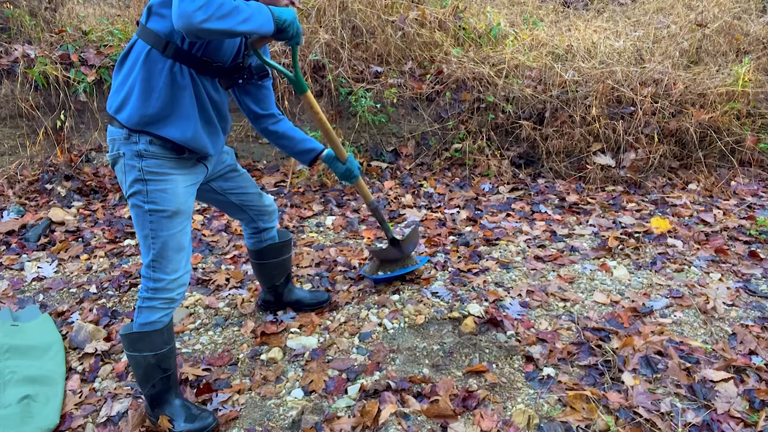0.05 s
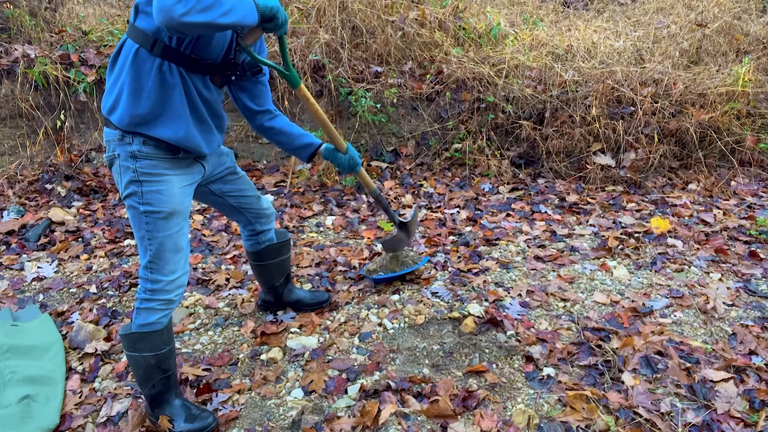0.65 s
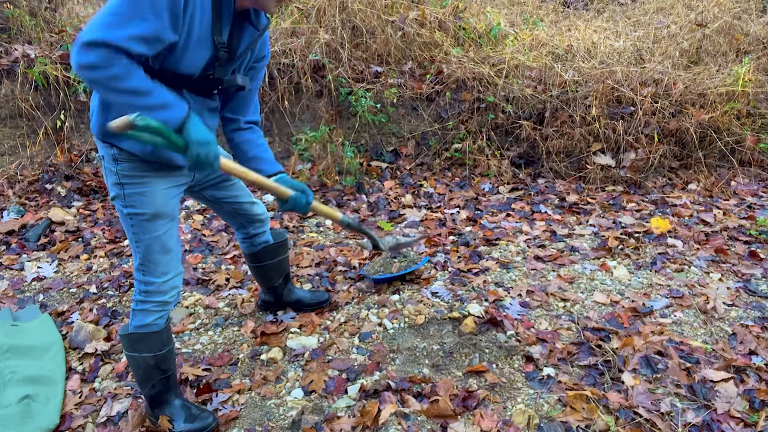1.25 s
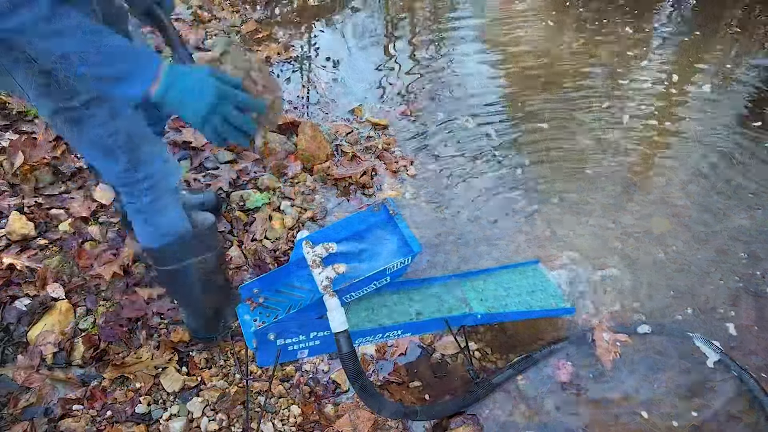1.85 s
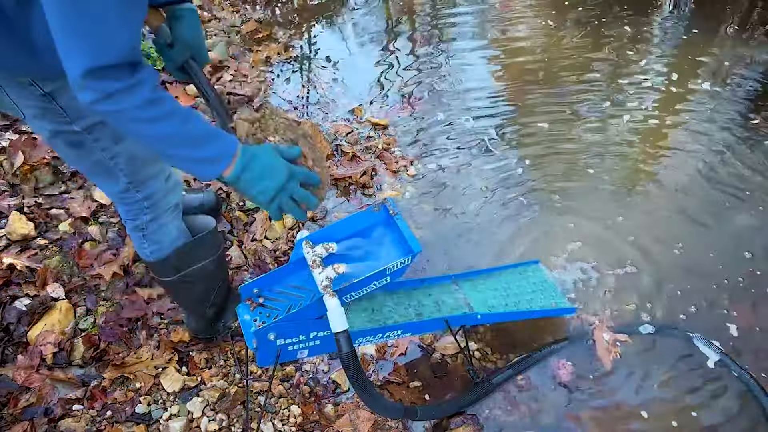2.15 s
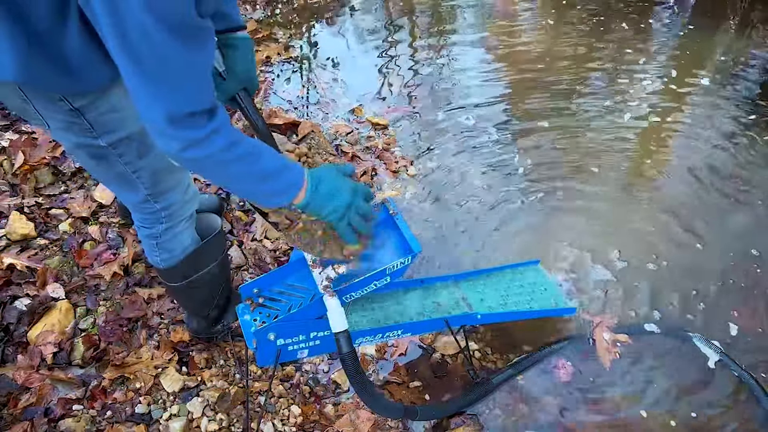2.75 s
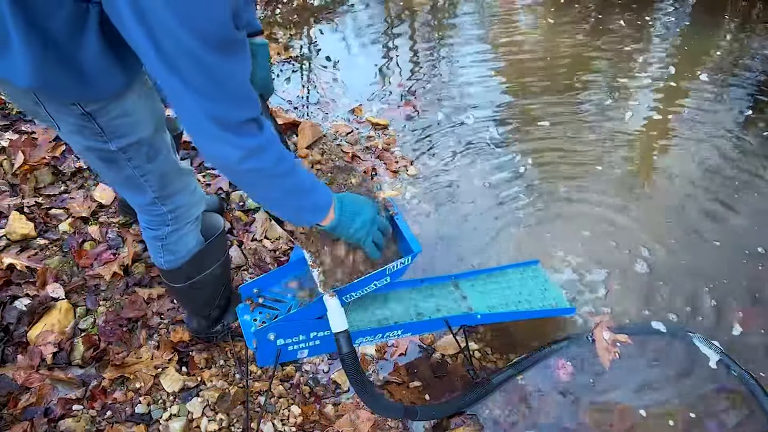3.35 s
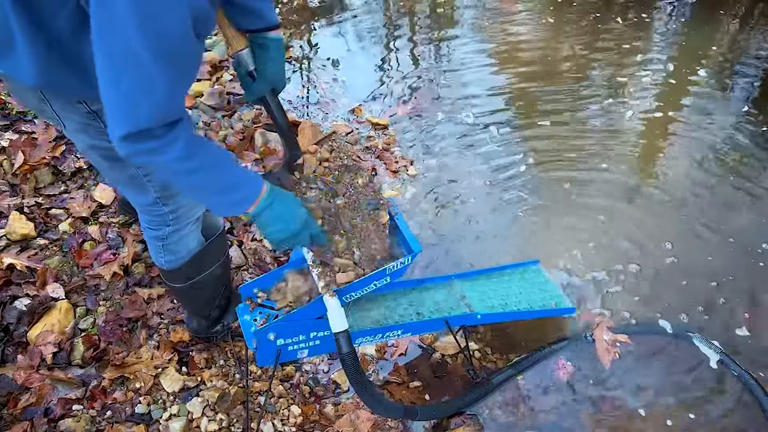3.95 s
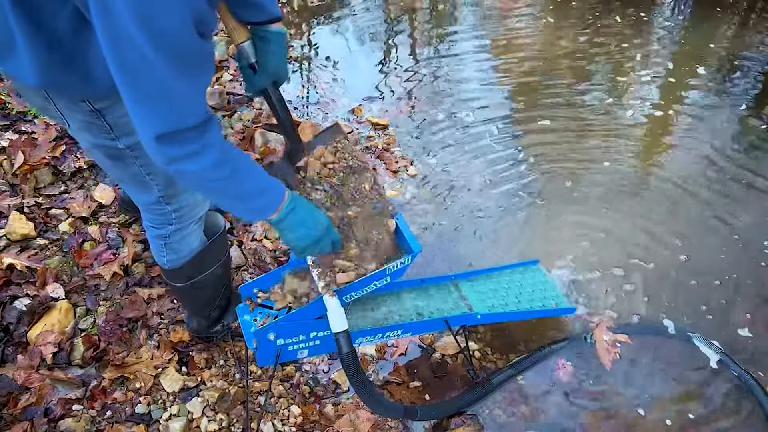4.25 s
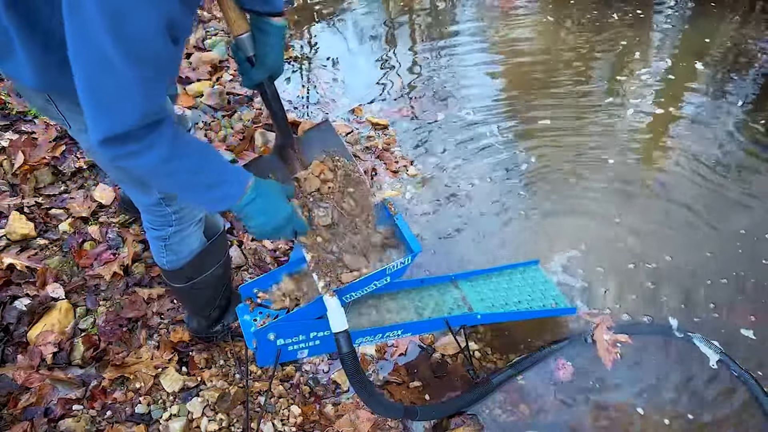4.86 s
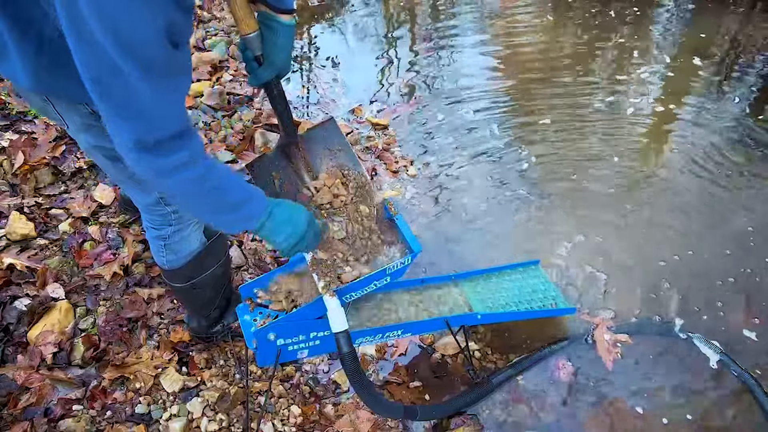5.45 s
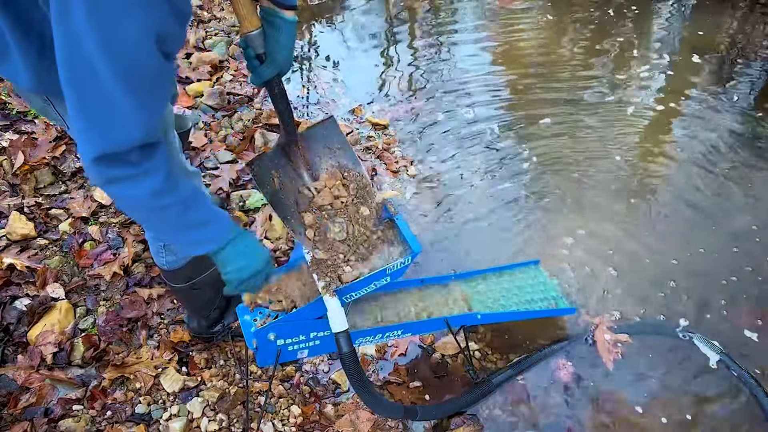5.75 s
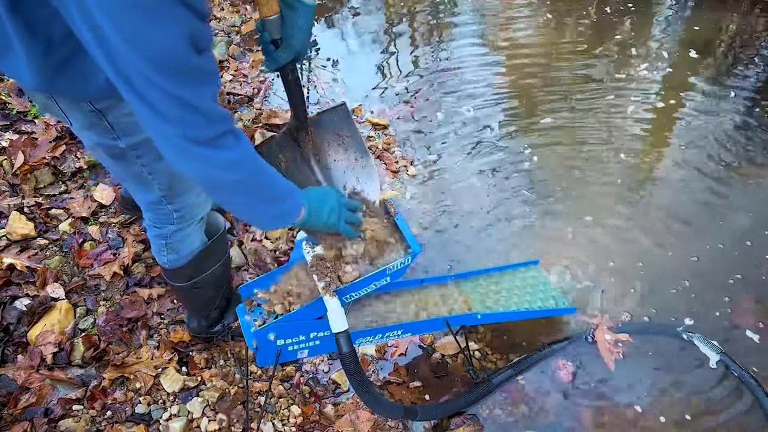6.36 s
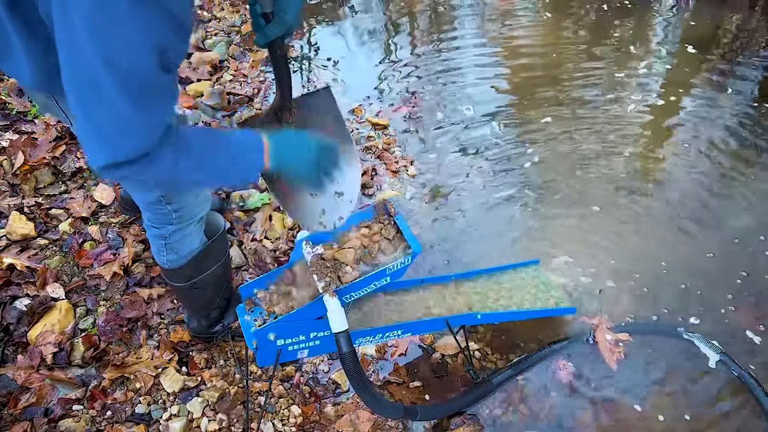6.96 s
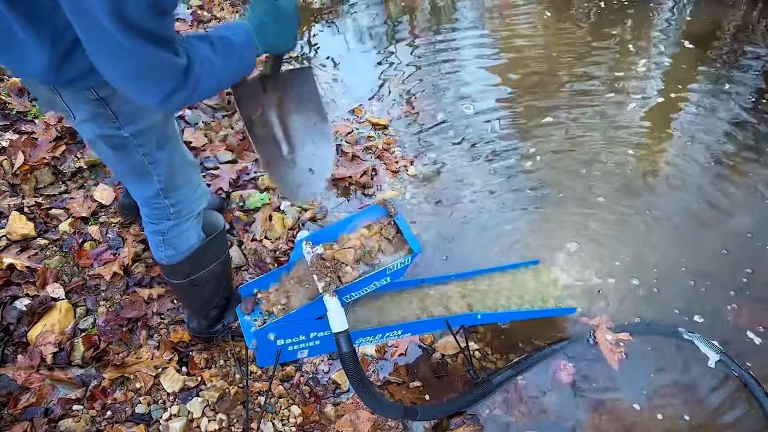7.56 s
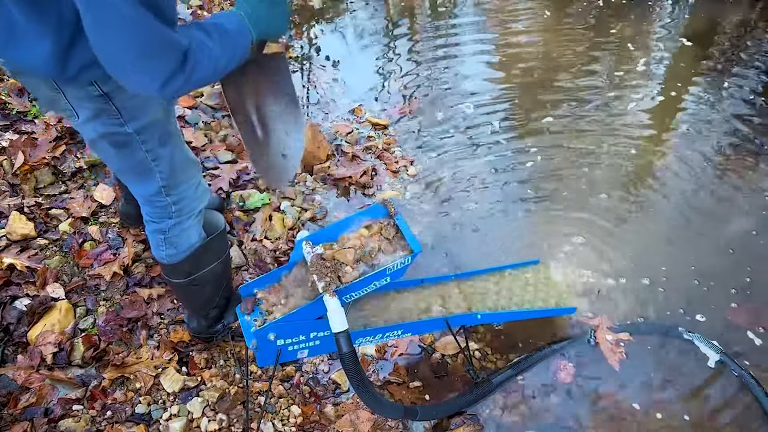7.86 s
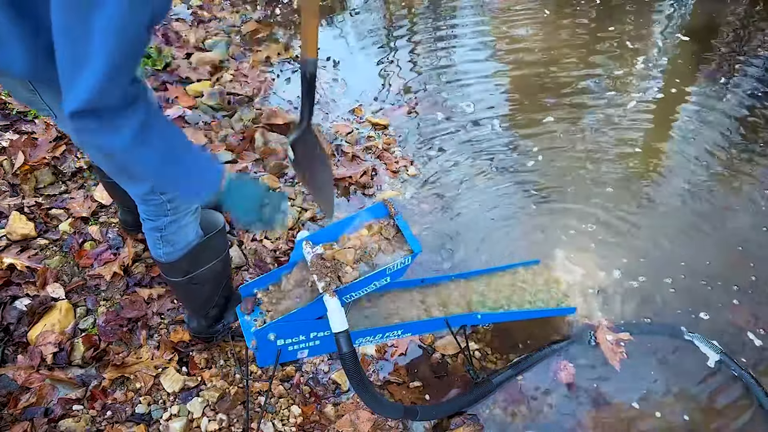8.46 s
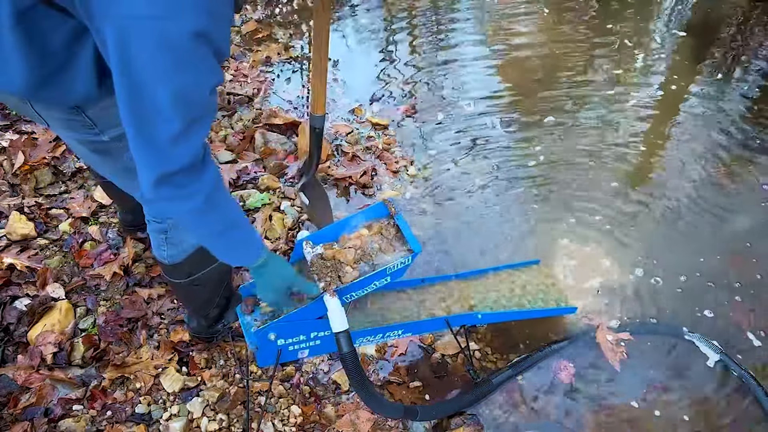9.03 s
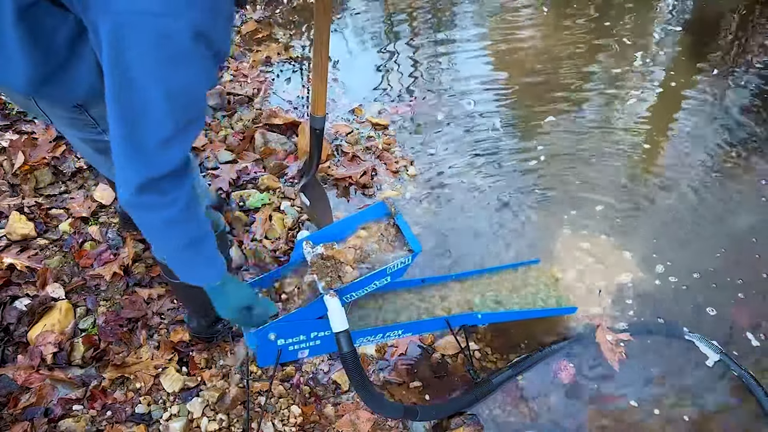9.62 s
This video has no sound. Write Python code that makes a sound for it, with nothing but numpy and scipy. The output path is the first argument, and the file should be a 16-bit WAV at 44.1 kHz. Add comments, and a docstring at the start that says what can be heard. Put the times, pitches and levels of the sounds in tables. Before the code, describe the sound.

After brief digging, gravel is pushed by hand through a plastic sluice, crunching and knocking over steadily splashing water.

```python
"""Beside a creek, a steel shovel rasps through wet gravel, its blade ringing as pebbles tick against it.
At about 1.5 s pumped water comes in, spraying and drumming on the hopper of a small plastic sluice.
From about 2.8 s a hand pushes the load along in bursts: grit slides and hisses, stones clack together
and knock on the walls, the stand rumbles. The pushes thin out after 6 s and pick up again near 9 s.
It all stays close, dry and nearly mono, with a few soft ground thuds and faint open air behind it."""
import sys
import numpy as np
from scipy import signal
from scipy.fft import rfft, irfft, next_fast_len
from scipy.io import wavfile

SR = 44100
rng = np.random.default_rng(int(sys.argv[2]) if len(sys.argv) > 2 else 0)


def inscribe(sig):
    """Save sig as 16-bit PCM at rate SR to the path in sys.argv[1].

    A 1-D sig is mono; a 2-D sig holds one channel per row.
    Samples are clipped to [-1, 1] before scaling.
    """
    pcm = np.round(np.clip(np.atleast_2d(sig).T, -1, 1) * 32767)
    wavfile.write(sys.argv[1], SR, pcm.astype(np.int16))


N = 427329

# Stone on stone. Each row: start in seconds, level in dB, centre in Hz, crack against decay in dB.
STONE_CLACKS = [(1.7555, -11.5, 4000, -17), (2.4097, -24.5, 4400, 2), (2.717, -22.5, 3700, -6),
                (2.7764, -17.5, 5000, -4), (2.8132, -22.5, 2830, -6), (2.875, -20, 4530, -16),
                (2.8995, -11, 5380, -19), (2.904, -13, 1670, -1), (2.9085, -19, 3380, -9),
                (2.9335, -12, 4600, -9), (2.9405, -12, 3920, -7.5), (2.983, -21.5, 4470, 1),
                (3.014, -26, 2900, 1), (3.0303, -20.5, 2260, -5), (3.041, -19, 3760, -10),
                (3.0485, -25, 2900, -12), (3.078, -26, 6340, -3), (3.105, -22, 2960, -8),
                (3.1277, -16, 5360, -3), (3.148, -21.5, 2400, -13), (3.165, -18, 1920, -19),
                (3.1795, -20.5, 2290, -9), (3.2034, -19, 4560, 6), (3.2492, -14.5, 1920, -14),
                (3.329, -25.5, 1700, -10), (3.4038, -42, 3500, -3), (3.4412, -26, 5210, -8),
                (3.482, -17.5, 4470, -4), (3.4885, -18, 2450, -11), (3.512, -22.5, 2000, -10),
                (3.541, -25.5, 6500, -6), (3.6125, -24, 5100, -2), (3.6305, -21, 3220, 1),
                (3.6682, -27, 7000, -4), (3.684, -27, 7060, -6), (3.754, -22.5, 3970, -2),
                (3.823, -12.5, 3250, -1), (3.9226, -34, 4450, -11), (3.9664, -23.5, 3720, -2),
                (4.0265, -27, 3620, -11), (4.172, -20.5, 3130, -5), (4.194, -21, 3430, -14),
                (4.291, -29.5, 6430, -10), (4.304, -26, 3000, -13), (4.341, -20, 3150, -17),
                (4.3491, -26, 5550, -12), (4.4195, -35, 5000, -2), (4.4604, -28, 6000, 1),
                (4.556, -26, 3340, 6), (4.6025, -31, 5000, -4), (4.648, -26.5, 1780, -5),
                (4.7564, -22, 2670, -2), (4.8153, -23, 5250, 1), (4.885, -23.5, 3000, -4),
                (4.9634, -27, 4790, 10), (5.1004, -28, 4300, -13), (5.168, -26, 4000, -14),
                (5.1885, -28, 3840, -12), (5.3598, -33.5, 6000, -2), (5.656, -27, 2550, -21),
                (5.8448, -16, 7200, -22), (5.845, -12, 2970, -10), (5.945, -23, 3500, -8),
                (5.976, -22, 5550, 1), (5.9995, -17, 5800, -11), (6.038, -24, 3800, -7),
                (6.298, -9, 3330, 2), (6.304, -19, 3020, -16.5), (6.401, -26.5, 3320, 1.5),
                (6.5375, -31, 4180, -3), (6.5954, -17.5, 5570, -2), (6.641, -28, 3240, 6),
                (6.678, -24, 5000, 1), (6.8293, -22, 4150, -11), (6.987, -30.5, 4170, -6),
                (7.003, -27, 4340, -1), (7.0847, -24, 3320, -1), (7.1035, -23.5, 3170, -19),
                (7.165, -22.5, 2560, -2), (7.1986, -25.5, 4450, 4), (7.313, -28, 3500, -11),
                (7.425, -27.5, 3700, -16), (7.5856, -32, 7400, -4), (7.8334, -26.5, 5340, -4),
                (8.101, -21.5, 6040, 3), (8.154, -22, 5700, -2), (8.3394, -23.5, 6000, -8),
                (8.575, -27.5, 2490, -15), (8.682, -13, 4650, -9), (8.69, -15, 4160, -20),
                (8.696, -10.5, 3660, -10), (9.0985, -24, 2420, -8), (9.275, -23.5, 2404, -19),
                (9.433, -25.5, 2370, -17), (9.542, -25.5, 2690, 10)]
# Pebbles on the blade. Each row: start in seconds, level in dB, centre in Hz, t60 in seconds,
# crack against decay in dB.
PEBBLE_TICKS = [(0.3628, -30.5, 3500, .012, 8), (.4704, -37.5, 6000, .02, -4),
                (0.477, -39, 2500, 0.018, -5), (.538, -39, 6800, .03, -12), (.5443, -36, 5500, .02, -2),
                (0.5624, -28.5, 4940, 0.022, 6), (0.5984, -38, 1450, 0.011, 6), (.643, -42, 3760, .025, -7),
                (.655, -38, 6200, 0.031, -5), (0.818, -46, 1990, 0.019, -10),
                (0.884, -34, 4200, 0.049, -14), (.928, -33, 8650, .013, 11), (0.974, -36.5, 4800, 0.033, 0),
                (1.079, -46, 5840, 0.032, -8), (1.16, -44, 5060, 0.04, -11), (1.328, -46, 4150, 0.023, 2),
                (1.337, -37, 5000, 0.026, -11), (1.364, -36, 2450, 0.13, -3), (1.377, -38.5, 7000, .03, -8),
                (1.392, -47, 5500, .012, 7), (1.409, -40, 5500, 0.045, -12),
                (1.4457, -45.5, 1300, .035, -5), (1.598, -40, 7100, 0.024, 3)]
# Heavy stones landing on the hopper. Each row: start in seconds, knock level in dB, its pitch in Hz,
# its t60 in seconds, panel ring in dB.
HOPPER_KNOCKS = [(2.814, -17.5, 772, 0.13, -20.5), (2.904, -16, 741, 0.13, -14.5),
                 (2.934, -31, 586, 0.073, -23), (2.941, -25, 720, 0.062, -21), (2.956, -24, 575, 0.17, -27),
                 (3.0303, -23.5, 750, 0.067, -19.5), (3.042, -23.5, 753, 0.18, -22),
                 (3.124, -24.5, 547, 0.074, -25), (3.165, -20.5, 796, 0.17, -16),
                 (3.249, -20, 523, 0.027, -15), (3.332, -30, 620, .05, -36), (3.405, -28, 734, .06, -33),
                 (3.435, -23, 790, 0.08, -29), (3.4876, -25.5, 780, .04, -29), (4.249, -27, 775, .045, -34),
                 (4.304, -20.5, 730, 0.021, -44), (4.353, -19.5, 767, 0.029, -33),
                 (4.389, -25, 723, 0.063, -41.5), (4.509, -27.5, 800, 0.056, -40),
                 (4.522, -25.5, 750, 0.04, -37), (4.5425, -19.5, 737, 0.044, -43),
                 (4.7564, -22, 776, 0.087, -26.5), (4.87, -22, 767, 0.058, -31),
                 (5.394, -33, 990, 0.056, -31), (5.845, -14, 596, 0.081, -39),
                 (5.947, -29.5, 703, .04, -46), (6.001, -24.5, 507, 0.038, -28.5),
                 (6.043, -31.5, 528, 0.057, -42), (6.305, -23, 733, 0.092, -30),
                 (7.0862, -33, 520, 0.029, -33), (7.1035, -25, 545, 0.023, -43),
                 (7.164, -21.5, 561, 0.056, -33), (7.197, -35, 493, .04, -40)]
# Modes of a struck wall. Each row: ratio to its pitch, relative level in dB, share of the knock's t60.
WALL_MODES = [(.5, -12.5, 0.94), (.7, -7, 1), (0.859, -1, 0.66), (1, 9, 0.6), (1.15, -0.5, 0.66)]
# The panels' higher modes. Each row: pitch in Hz, relative level in dB, t60 in seconds.
PANEL_MODES = [(1260, -2.5, .042), (1450, -0.5, 0.07), (1630, 2.5, 0.036), (2380, -7.5, 0.036),
               (2960, 0, 0.036), (3620, -1.5, 0.036)]
# The wall's note under the load, lower near the feed end. Each row: time in seconds, pitch in Hz.
WALL_PITCH = [(2.9, 770), (2.96, 537), (3.2, 766), (4.55, 740), (5.6, 836), (5.85, 640), (6.02, 523),
              (6.3, 700), (7.1, 534), (9.05, 501), (9.6, 580)]
# Hand pushes. Each row: start in seconds, length in seconds, grit level in dB, wall ring in dB.
HAND_PUSHES = [(2.795, 0.2, -33, -36), (3.069, 0.15, -26, -25), (3.226, 0.13, -29, -47),
               (3.332, 0.14, -29.5, -30), (3.489, 0.094, -27.5, -43.5), (3.57, 0.16, -26, -35),
               (3.794, 0.055, -34, -33), (3.897, 0.2, -37.5, -39), (4.138, 0.12, -26, -35),
               (4.25, 0.19, -24, -42), (4.418, 0.15, -31, -32.5), (4.58, 0.18, -33.5, -35.5),
               (4.768, 0.14, -29.5, -32), (4.937, 0.1, -33, -47), (5.058, .11, -32.5, -56),
               (5.203, 0.056, -30, -52), (5.305, 0.04, -46, -31.5), (5.798, 0.23, -35, -54),
               (6.223, 0.11, -31, -52), (6.464, 0.065, -34, -64), (7.02, 0.17, -37, -44),
               (8.714, 0.082, -34, -42), (8.882, 0.079, -28.5, -36.5), (8.946, 0.19, -25.5, -33.5),
               (9.163, 0.064, -32.5, -62), (9.258, 0.3, -30.5, -42)]
# The water's fader moves. Each row: time in seconds, spray level in dB, drumming level in dB.
WATER_LEVELS = [(0, -77, -110), (1.42, -75, -83), (1.55, -45.5, -49.5), (1.65, -41, -43.5),
                (1.8, -34, -37.5), (2.5, -34, -36.5), (4.0, -31, -38), (5.0, -31.5, -36.5), (5.6, -37, -38),
                (6.2, -31, -43.5), (6.9, -35, -44), (7.55, -34.5, -45), (8.0, -34, -48), (8.5, -36, -41),
                (8.87, -36, -47), (9.69, -33.5, -47)]
# Resonances. Each row: pitch in Hz, width in Hz, relative level in dB.
HOPPER_MODES = [(147.5, 34, -4.5), (208, 41, -0.5), (243, 46, -1.5), (374, 87, -1.5), (640, 400, 2)]
BLADE_MODES = [(2380, 110, 3), (2770, 92, 6), (3500, 300, 7), (4660, 270, -14), (5000, 1500, 16),
               (6060, 80, -4), (8400, 360, -8)]
PUMP_MODES = [(70, 4.9, -60.5), (90.6, 6.8, -61.5)]
# Shovel strokes. Each row: start in seconds, length in seconds, level in dB, ring against rasp in dB.
SHOVEL_STROKES = [(-.03, 0.037, -36.5, -8), (0.043, 0.17, -45.5, 3), (0.203, 0.24, -41, 6),
                  (0.476, 0.067, -41.5, 10), (0.62, 0.036, -47, 0), (0.703, 0.11, -52.5, -20),
                  (0.948, 0.081, -54, -4), (1.265, 0.065, -51, -5), (1.342, 0.087, -45, -24)]
# The blade's main bending mode. Each row: time in seconds, level in dB, pitch in Hz.
BLADE_BENDING = [(0, -55, 1520), (.15, -60, 1510), (.3, -52, 1550), (.46, -55, 1520), (.515, -45, 1520),
                 (.545, -44, 1610), (.6, -57, 1560), (.8, -64, 1520), (2, -110, 1515)]
# The note of the sluice box's hollow. Each row: time in seconds, pitch in Hz.
BOX_PITCH = [(2.4, 196), (4.9, 203), (5.8, 208), (7.6, 228), (8.7, 238)]
# Its modes. Each row: ratio to that pitch, width in Hz, level at full spray in dB.
BOX_MODES = [(1, 65, -48), (2, 44, -53.5)]
# Soft thuds through the ground. Each row: start in seconds, level in dB, pitch in Hz.
GROUND_THUDS = [(1.83, -52, 79.6), (3.26, -47, 84.5), (5.86, -48, 90.7), (6.04, -45, 70), (6.33, -45.5, 98),
                (8.731, -45, 70)]
# Tone curves of the noise layers and the left channel. Each row: frequency in Hz, gain in dB.
GRIT_EQ = [(250, -38), (500, 4), (1200, 7), (2000, 4), (3100, 5), (4200, 1), (6000, -2), (7600, -11.5),
           (10000, -10), (12500, -19), (16000, -23)]
SPRAY_EQ = [(100, -31.5), (300, -4), (520, -0.5), (950, -1), (1550, 5), (2000, 3.5), (2700, 4),
            (4000, -0.5), (6000, -0.5), (7500, -8.5), (10000, -6.5), (12500, -14), (16000, -19.5)]
DROPLET_EQ = [(1000, -17), (3000, 3.5), (6000, 0), (10000, -1), (16000, -10)]
SCRAPE_EQ = [(150, 2), (500, 6.5), (1200, 5.5), (2500, 9), (5000, 6.5), (7000, -4), (10000, -2.5),
             (16000, -8)]
AIR_EQ = [(25, -25), (45, -21), (65, 16), (110, 6.5), (220, 9), (400, 2), (1200, -3), (3000, -6.5),
          (8000, -8.5), (16000, -16)]
LEFT_EQ = [(60, -1), (130, -.1), (300, .7), (700, 1.0), (1800, .3), (10000, .2)]
# Stereo width of the textures and of the hits. Each row: frequency in Hz, side against mid in dB.
TEXTURE_WIDTH = [(30, -13), (65, -15), (150, -11.5), (270, -9), (450, -9), (750, -14.5), (1250, -24.5),
                 (2000, -73), (4000, -53), (8000, -9), (13000, -38)]
HIT_WIDTH = [(300, -35), (1200, -20.5), (4000, -34), (8000, -13.5), (14000, -25)]


def stones(grit_gain):
    """Stones clack on the blade and each other; heavy ones knock on the hopper and ring its panels."""
    out, t = np.zeros(N + SR), np.arange(SR // 6) / SR
    # each contact: crack t60 in seconds, crack width as a share of its centre, dull knock in dB
    on_steel, on_stone = (.0021, .28, -20.5), (.0062, 1, -26)  # steel cracks short and pitched
    hits = [(*row, *on_steel, 990) for row in PEBBLE_TICKS]  # the blade knocks at 990 Hz
    for s, db, hz, crack_db in [*STONE_CLACKS, *tumbling(grit_gain)]:
        t60 = .022 * np.exp(.087 * rng.standard_normal())
        wall_hz = np.interp(s, *np.transpose(WALL_PITCH))
        hits.append((s, db, hz, t60, crack_db, *on_stone, wall_hz))
    for s, db, hz, t60, panel_db in HOPPER_KNOCKS:
        add_hit(out, s, knock(t, hz, t60), db)
        add_hit(out, s, struck(t, PANEL_MODES, spread_db=4.5, detune=.027), panel_db)
    for s, db, hz, t60, crack_db, crack_t60, crack_width, knock_db, knock_hz in hits:
        add_hit(out, s, clack(t, hz, t60, crack_db, crack_t60, crack_width), db)
        add_hit(out, s, knock(t, knock_hz, t60=.026), db + knock_db)
    return eq(out[:N], [(150, -20), (350, -1), (1000, 2.5), (1600, .5), (3000, -3), (6000, -5),
                        (10500, -2.5), (15000, -6.5)])


def clack(t, centre_hz, t60, crack_db, crack_t60, crack_width, ring_width_hz=150, ring_count=4):
    """A stone strikes something hard: an instant crack, a dense bright decay and short rings."""
    impact = rng.standard_normal(len(t)) * fade(t, crack_t60)
    crack = resonate(impact, centre_hz, crack_width * centre_hz)
    envelope = (1 - np.exp(-t / .002)) * (fade(t, t60) + from_db(-28) * fade(t, t60=.17))
    burst = rng.standard_normal(len(t)) * envelope
    # one ring at the centre of the clack, the others scattered by the stone's shape
    scatter = (np.arange(ring_count) + rng.random(ring_count)) / ring_count * 2 - 1
    ring_hz = np.minimum(centre_hz * np.exp(.59 * scatter), SR / 3)
    scattered = sum(resonate(burst, hz, ring_width_hz) for hz in ring_hz)
    rings = resonate(burst, centre_hz, ring_width_hz) + from_db(-5.5) * scattered
    decay = rms_one(resonate(burst, centre_hz, .57 * centre_hz)) + from_db(1) * rms_one(rings)
    return low_cut(rms_one(decay) + from_db(crack_db) * rms_one(crack), hz=1000)


def knock(t, pitch_hz, t60, attack_s=.00051):
    """A hollow knock, roughened by the loose load jumping on the struck wall."""
    modes = [(ratio * pitch_hz, db, share * t60) for ratio, db, share in WALL_MODES]
    tone = struck(t, modes, spread_db=3, detune=.025)
    rattle = resonate(rng.standard_normal(len(t)) * fade(t, t60=.1), pitch_hz, .45 * pitch_hz)
    return (tone + from_db(-5) * rms_one(rattle)) * (1 - np.exp(-t / attack_s))


def tumbling(grit_gain, candidates=300, crack_db=-31):
    """Small stones tumble at random, driven by water and the moving load; rows like STONE_CLACKS."""
    spray_gain = from_db(automation(WATER_LEVELS)[0])
    flow = np.hypot(spray_gain, grit_gain)
    per_s = .8 * spray_gain / spray_gain.max() + 10 * grit_gain / grit_gain.max()
    when, luck = rng.random((2, candidates))
    size_db, shape = rng.standard_normal((2, candidates))
    start = (when * N).astype(int)
    flow_db = 20 * np.log10(flow[start] / flow.max())
    db = -27.5 + .17 * flow_db + size_db
    hz = 3500 * np.exp(.217 * shape)
    rows = np.transpose([start / SR, db, hz, np.full(candidates, crack_db)])
    return rows[luck < per_s[start] * N / SR / candidates]


def hand_pushes():
    """The hand shoves the load: gains for the grit and the wall's ring, overlaps adding in power."""
    power = np.zeros((2, N)) + 1e-12
    for s, length_s, grit_db, ring_db in HAND_PUSHES:
        push = gesture(s, length_s, attack_s=.056, release_db_per_s=158)
        power += (from_db([[grit_db], [ring_db]]) * push) ** 2
    return np.sqrt(power)


def sliding_gravel(grit_gain, ring_gain, bumps_per_s=35):
    """Grit crunches and pebbles tick as the load moves; their bumps set the hopper wall ringing."""
    crunch = spatter(per_s=450, spread_db=2.4, t60=.022)
    contacts = grains(per_s=1400, spread_db=1.5)
    ticks = from_db(-.5) * pings(contacts, low_hz=904.4, high_hz=12590, q=47, count=32)
    # hard edges snap past each other, very short and bright
    snaps = from_db(2) * spatter(per_s=70, spread_db=1.7, t60=.008)
    snaps = eq(snaps, [(1000, -13), (4000, -6), (9000, -1), (15000, 0)])
    grit = rms_one(eq(crunch + ticks + snaps, GRIT_EQ))
    # each bump lands on another spot of the wall, with a pitch and a weight of its own
    pitch_hz = automation(WALL_PITCH)[0] * np.exp(.06 * drift(bumps_per_s))
    bumps = rng.standard_normal(N) * from_db(4.5 * np.clip(drift(bumps_per_s), -2, 1))
    return grit_gain * grit + ring_gain * gliding_ring(bumps, pitch_hz, width_hz=122)


def water():
    """Jets hiss, drops splat, bubbles ring and the hopper drums; pump and box drone with the flow."""
    spray_db, drum_db = automation(WATER_LEVELS)
    hiss = from_db(-.5) * rng.standard_normal(N) * from_db(drift(per_s=40))
    splats = spatter(per_s=170, spread_db=2.3, t60=.015)
    splats = eq(splats, [(500, -4), (2500, -3.5), (7000, -2), (14000, -6)])
    pops = grains(per_s=520, spread_db=3.1)
    bubbles = from_db(-6.5) * pings(pops, low_hz=400, high_hz=4000, q=20, count=48)
    spray = rms_one(eq(rms_one(hiss + splats) + bubbles, SPRAY_EQ))
    hopper = body(rng.standard_normal(N), HOPPER_MODES)
    drum = rms_one(eq(hopper, [(60, -13), (140, -3.5), (800, -2.5), (2000, 1.5)]))
    hum = pump_hum()
    splashing = from_db(spray_db) * (spray + droplets()) + surfacing_bubbles(spray_db)
    flow = from_db(spray_db - spray_db.max())
    return splashing + from_db(drum_db) * drum + flow * (hum + box_drone())


def surfacing_bubbles(spray_db, per_s=30, centre_hz=1650, rise=.05):
    """Single bubbles ring out of the spray and glide up as they surface; low ones ring longer."""
    out, t = np.zeros(N + SR), np.arange(SR // 10) / SR
    count = int(per_s * N / SR)
    starts = rng.integers(0, N, count)
    variations = np.clip(rng.standard_normal((count, 2)), -2, 2)
    for start, (strength, tuning) in zip(starts, variations):
        hz = centre_hz * np.exp(.42 * tuning)
        t60 = .04 * np.sqrt(centre_hz / hz)
        phase = 2 * np.pi * hz * t * (1 + rise * t / t60 / 2)
        gain = from_db(spray_db[start] + 1 + 2.8 * strength)
        out[start:start + len(t)] += gain * fade(t, t60) * np.sin(phase)
    return out[:N]


def droplets():
    """Stray drops tick on the plastic, small and bright."""
    ticks = spatter(per_s=32, spread_db=1.3, t60=.014)
    return from_db(-12) * rms_one(eq(ticks, DROPLET_EQ))


def shovel(dig_end_s=1.7):
    """Sand rasps along the steel and rings the blade's damped modes; leaves and grit crackle under it."""
    power = np.zeros((2, N))
    for s, length_s, db, ring_db in SHOVEL_STROKES:
        shares = np.array([[1], [from_db(ring_db) ** 2]])
        stroke = from_db(db) * gesture(s, length_s, attack_s=.026, release_db_per_s=134)
        power += shares / shares.sum() * stroke ** 2
    rasp_gain, steel_gain = np.sqrt(power)
    rasp = spatter(per_s=380, spread_db=2.2, t60=.008) + from_db(-1) * rng.standard_normal(N)
    steel = rms_one(body(rasp + rng.standard_normal(N), BLADE_MODES))
    scrape = rasp_gain * rms_one(eq(rasp, SCRAPE_EQ)) + steel_gain * steel
    crackle = rms_one(eq(spatter(per_s=110, spread_db=2.7, t60=.01), SCRAPE_EQ))
    digging = np.arange(N) / SR < dig_end_s
    return scrape + blade_bending() + from_db(-58) * digging * crackle


def blade_bending():
    """Two bending modes swell as the blade comes free; the upper one shifts with the pressure on it."""
    db, pitch_hz = automation(BLADE_BENDING)
    upper = gliding_ring(rng.standard_normal(N), pitch_hz, width_hz=150)
    lower = rms_one(resonate(rng.standard_normal(N), hz=1070, width_hz=19))
    return from_db(db) * (upper + from_db(-9) * lower)


def box_drone():
    """The water drones in the hollow of the box; the pitch creeps upward as gravel fills it."""
    pitch_hz, = automation(BOX_PITCH)
    return sum(from_db(db) * gliding_ring(rng.standard_normal(N), ratio * pitch_hz, width_hz)
               for ratio, width_hz, db in BOX_MODES)


def ground_thuds(swell_s=.024):
    """Soft ground takes a weight slowly and answers with a few low cycles."""
    out = np.zeros(N)
    for s, db, hz in GROUND_THUDS:
        t = np.maximum(np.arange(N) / SR - s, 0)
        out += from_db(db) * t / swell_s * np.exp(1 - t / swell_s) * np.sin(2 * np.pi * hz * t)
    return out


def stand_rumble(ring_gain, hz=98, width_hz=47):
    """The stand rocks from side to side and rumbles while the load shakes the hopper."""
    rumble = resonate(resonate(rng.standard_normal(N), hz, width_hz), hz, width_hz)
    return from_db(-57.5) * (ring_gain / ring_gain.max()) ** .39 * rms_one(rumble)


def pump_hum():
    """The pump hums in two low, narrow bands."""
    return eq(body(rng.standard_normal(N), PUMP_MODES), [(40, -19), (65, 0), (500, 3)])


def open_air():
    """A faint, bass-heavy bed of outdoor air."""
    return from_db(-55) * rms_one(eq(rng.standard_normal(N), AIR_EQ))


def from_db(db):
    """Decibels to gain."""
    return 10 ** (np.asarray(db) / 20)


def rms_one(x):
    """Scale to unit rms."""
    return x / np.sqrt(np.mean(x ** 2) + 1e-20)


def add_hit(track, s, hit, db, hold_s=.014):
    """Drop a hit in at `s` seconds, with the energy of `db` rms held for hold_s."""
    start = int(s * SR)
    track[start:start + len(hit)] += hit * from_db(db) * np.sqrt(hold_s * SR / np.sum(hit ** 2))


def automation(rows):
    """Turn timed breakpoints into one full-length curve per value column."""
    s, *columns = np.transpose(rows)
    return [np.interp(np.arange(N) / SR, s, column) for column in columns]


def fade(t, t60):
    """Decay by 60 dB in t60 seconds."""
    return np.exp(-np.log(1000) * t / t60)


def gesture(s, length_s, attack_s, release_db_per_s):
    """Gain of one movement: it builds up, holds, and dies as the stones settle."""
    t = np.arange(N) / SR - s
    return np.clip(t / attack_s, 0, 1) * from_db(-np.clip(release_db_per_s * (t - length_s), 0, 150))


def drift(per_s):
    """A random wander around zero, turning about per_s times a second."""
    knots = rng.standard_normal(N // 10)
    return np.interp(np.arange(N) * per_s / SR, np.arange(len(knots)), knots)


def eq(x, curve):
    """Minimum-phase EQ through (Hz, dB) points on a log-frequency axis."""
    size = 2 * next_fast_len(N // 2 + SR // 10)
    hz, db = np.transpose(curve)
    bin_hz = np.maximum(np.arange(size // 2 + 1) * SR / size, 1)
    gain = from_db(np.interp(np.log(bin_hz), np.log(hz), db))
    # fold the cepstrum so that nothing rings ahead of a transient
    cepstrum = irfft(np.log(gain))
    cepstrum[1:size // 2] *= 2
    cepstrum[size // 2 + 1:] = 0
    return irfft(rfft(x, size) * np.exp(rfft(cepstrum)))[:N]


def low_cut(x, hz):
    """Roll off the lows at 12 dB per octave."""
    return signal.sosfilt(signal.butter(2, hz, "high", fs=SR, output="sos"), x)


def resonate(x, hz, width_hz):
    """Two-pole resonance with unity gain at its peak."""
    r = np.exp(-np.pi * width_hz / SR)
    feedback = [1, -2 * r * np.cos(2 * np.pi * hz / SR), r * r]
    return signal.lfilter(np.array([1, 0, -1]) * (1 - r * r) / 2, feedback, x + 1e-18)


def gliding_ring(x, pitch_hz, width_hz):
    """A resonance whose centre moves, at unit rms."""
    carrier = np.exp(2j * np.pi * np.cumsum(pitch_hz) / SR)
    r = np.exp(-np.pi * width_hz / SR)
    return rms_one((signal.lfilter([1], [1, -2 * r, r * r], x / carrier + 1e-18) * carrier).real)


def body(x, modes):
    """Parallel resonances, each at its own rms level."""
    return sum((-1) ** k * from_db(db) * rms_one(resonate(x, hz, width_hz))
               for k, (hz, width_hz, db) in enumerate(modes))


def struck(t, modes, spread_db, detune):
    """Decaying modes (Hz, dB, t60); the point of contact changes the strength and tuning of each."""
    out = np.zeros(len(t))
    for k, (hz, db, t60) in enumerate(modes):
        strength, tuning = rng.standard_normal(2)
        tone = np.sin(2 * np.pi * hz * (1 + detune * tuning) * t)
        out += (-1) ** k * from_db(db + spread_db * strength) * fade(t, t60) * tone
    return rms_one(out)


def grains(per_s, spread_db):
    """Random clicks, many small and a few large."""
    sizes = from_db(spread_db * np.minimum(rng.exponential(1, N), 4.5))
    return rms_one((rng.random(N) < per_s / SR) * sizes * rng.choice([-1, 1], N))


def spatter(per_s, spread_db, t60):
    """Random bursts of noise with a sharp start and a fast decay."""
    power = signal.lfilter([1], [1, -from_db(-120 / (t60 * SR))], grains(per_s, spread_db) ** 2 + 1e-18)
    return rms_one(np.sqrt(power) * rng.standard_normal(N))


def pings(clicks, low_hz, high_hz, q, count):
    """Deal clicks to resonators spread in pitch; equal power per Hz on average."""
    dealt = rng.integers(0, count, N)
    return rms_one(sum(np.sqrt(hz) * rms_one(resonate(clicks * (dealt == k), hz, hz / q))
                       for k, hz in enumerate(np.geomspace(low_hz, high_hz, count))))


def scene():
    """Mix in mid and side: nearly everything sits centre, the thuds and the stand's rumble spread wide."""
    air = open_air()
    grit_gain, ring_gain = hand_pushes()
    textures = air + water() + shovel() + sliding_gravel(grit_gain, ring_gain)
    thuds, rumble = ground_thuds(), stand_rumble(ring_gain)
    # each drop and stone lies a little to the left or right, so the side signal changes sign at random
    texture_pan, hit_pan = drift(per_s=40), drift(per_s=75)
    hits = stones(grit_gain)
    # the thuds arrive out of step on the left and right
    thud_side = from_db(1) * signal.hilbert(thuds, next_fast_len(N))[:N].imag
    mid = textures + hits + thuds
    side = eq(textures * texture_pan, TEXTURE_WIDTH) + eq(hits * hit_pan, HIT_WIDTH) + rumble + thud_side
    return np.array([eq(mid, LEFT_EQ) + side, mid - side])


def record(dry, top_hz=16000):
    """Soft-clip the hardest clacks, thin the deepest bass and cut the very top."""
    clipped = dry / (1 + dry ** 4) ** .25
    high_cut = signal.ellip(12, .1, 80, top_hz, fs=SR, output="sos")
    return signal.sosfilt(high_cut, low_cut(clipped, hz=42))


dry = scene()
out = record(dry)
inscribe(out)
```